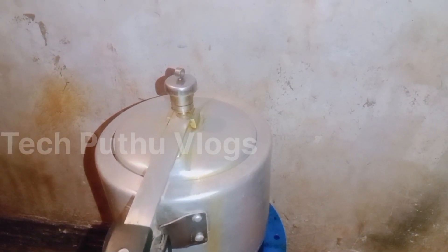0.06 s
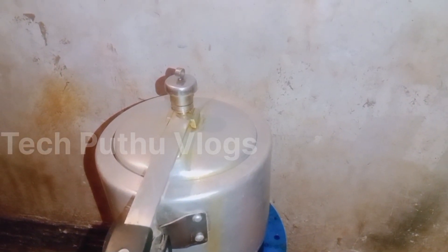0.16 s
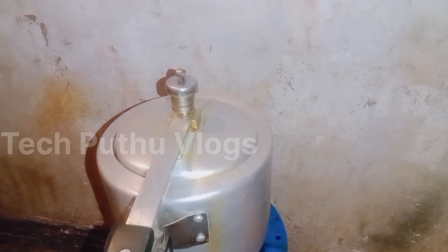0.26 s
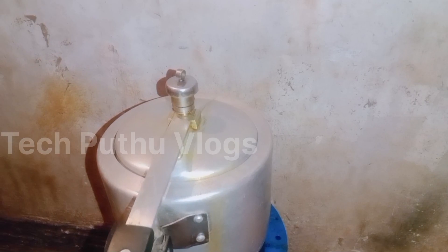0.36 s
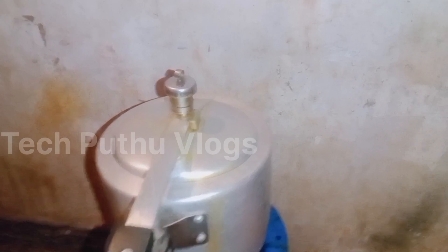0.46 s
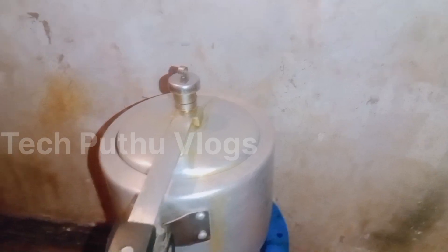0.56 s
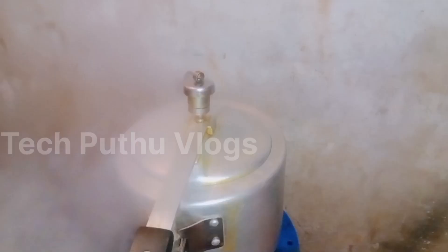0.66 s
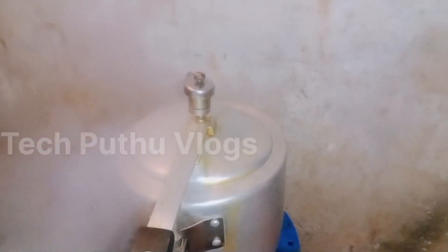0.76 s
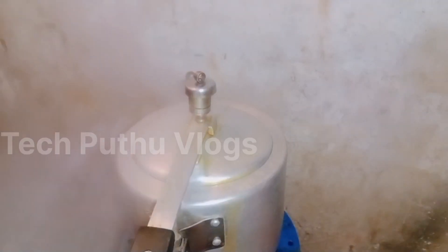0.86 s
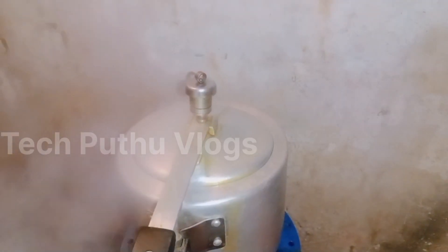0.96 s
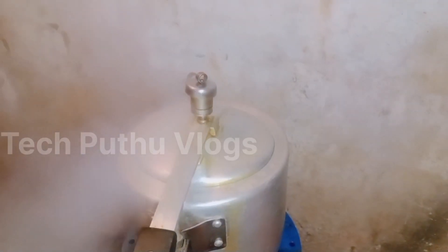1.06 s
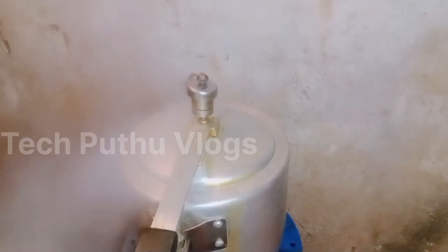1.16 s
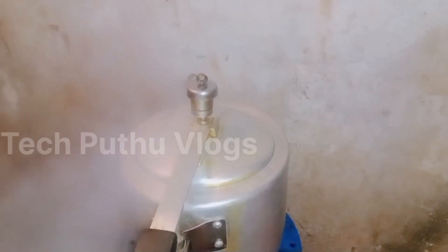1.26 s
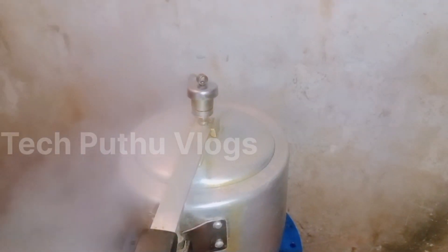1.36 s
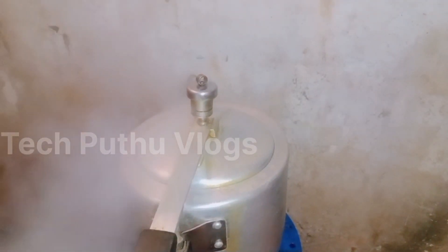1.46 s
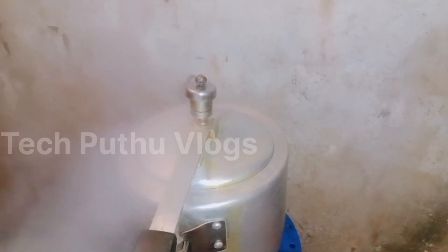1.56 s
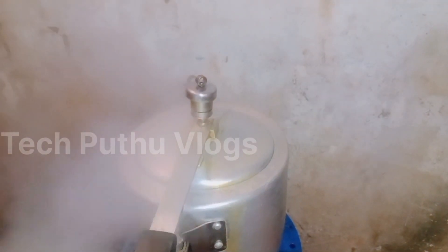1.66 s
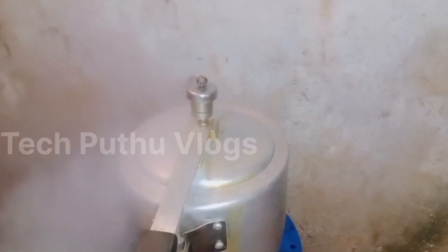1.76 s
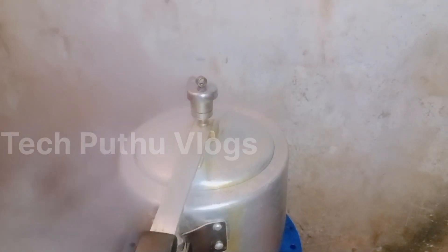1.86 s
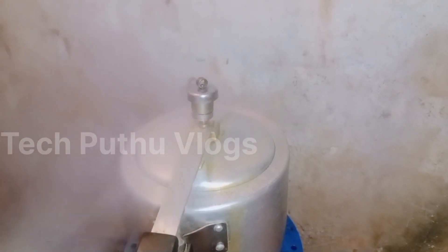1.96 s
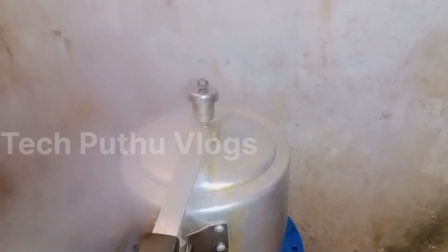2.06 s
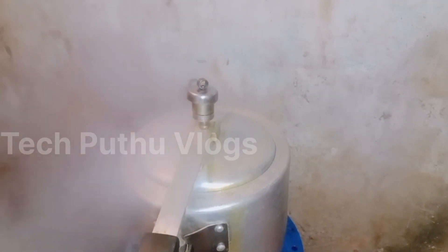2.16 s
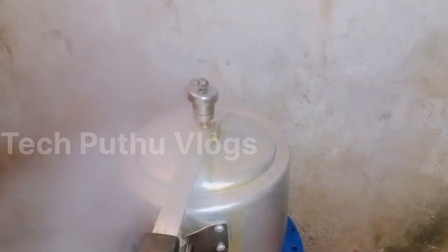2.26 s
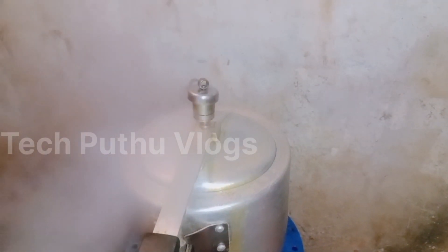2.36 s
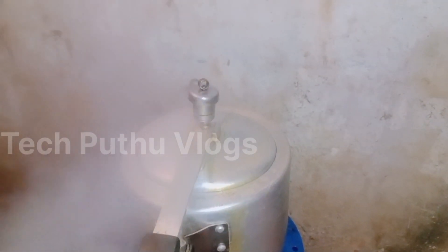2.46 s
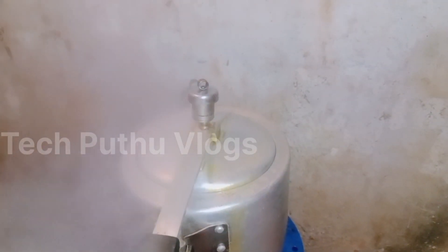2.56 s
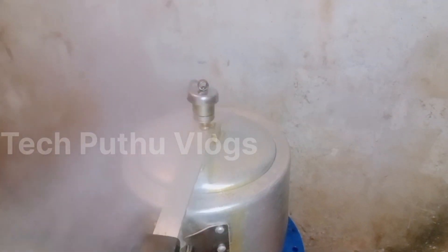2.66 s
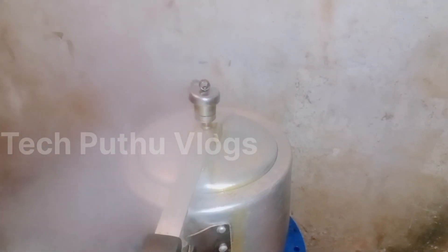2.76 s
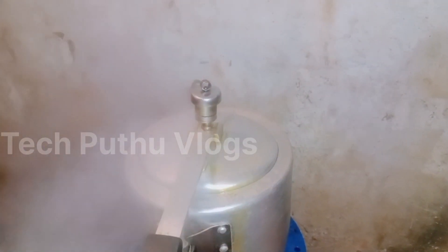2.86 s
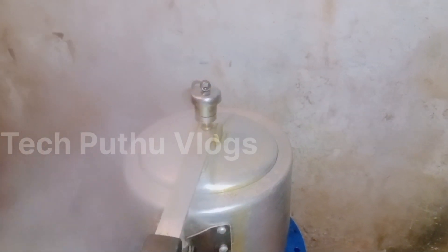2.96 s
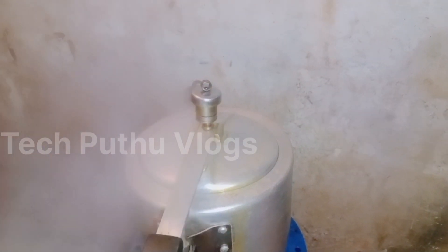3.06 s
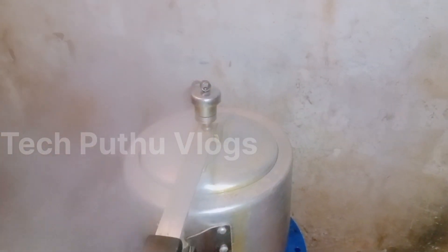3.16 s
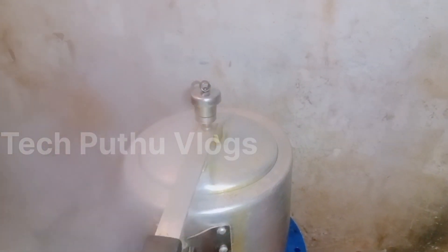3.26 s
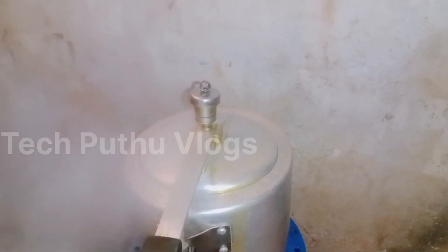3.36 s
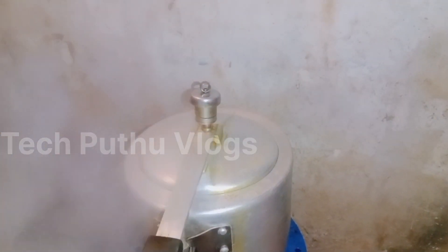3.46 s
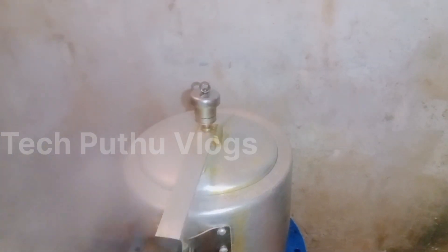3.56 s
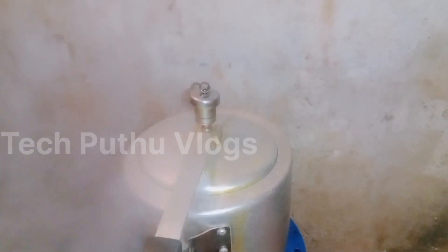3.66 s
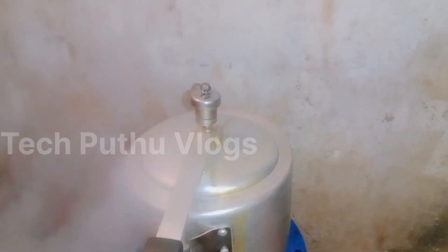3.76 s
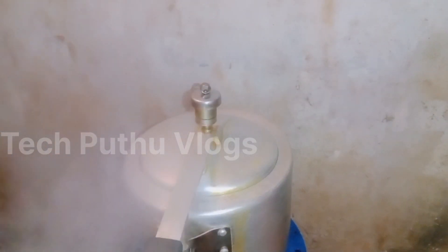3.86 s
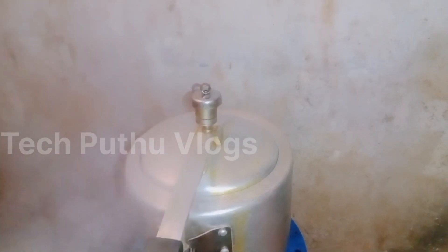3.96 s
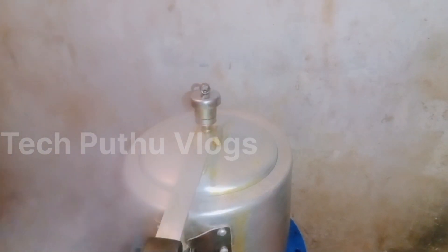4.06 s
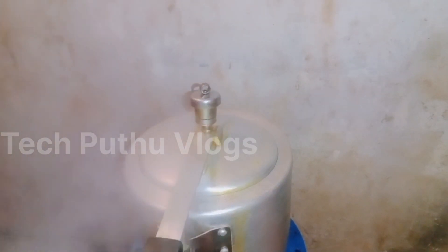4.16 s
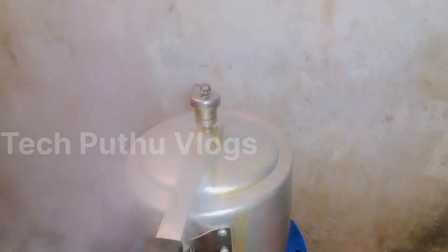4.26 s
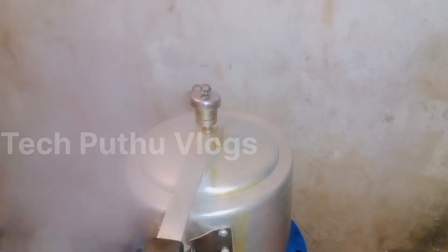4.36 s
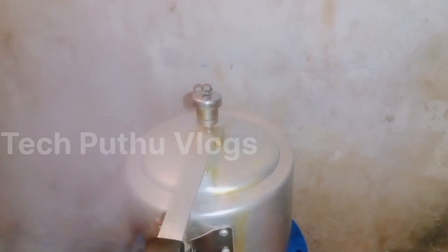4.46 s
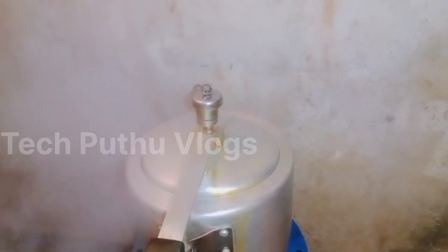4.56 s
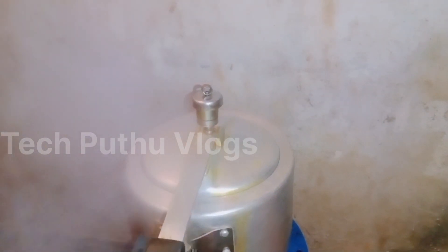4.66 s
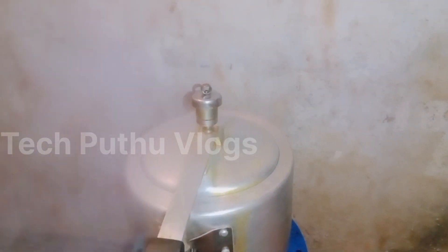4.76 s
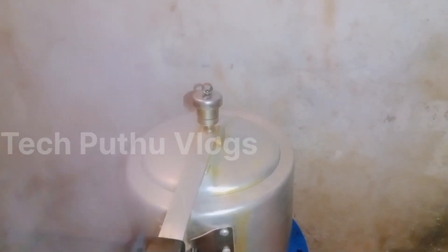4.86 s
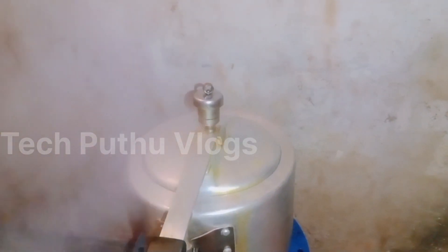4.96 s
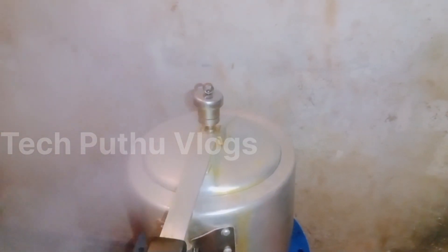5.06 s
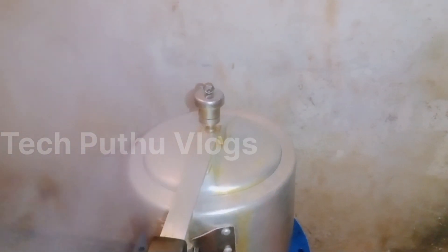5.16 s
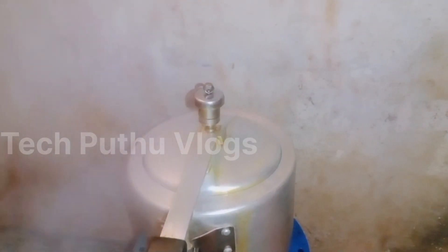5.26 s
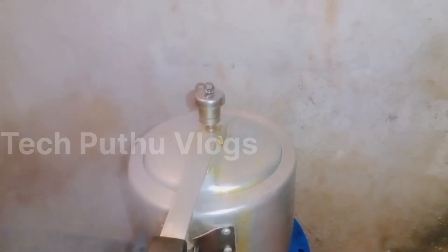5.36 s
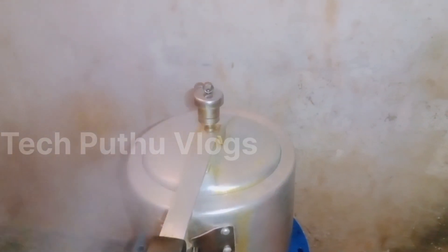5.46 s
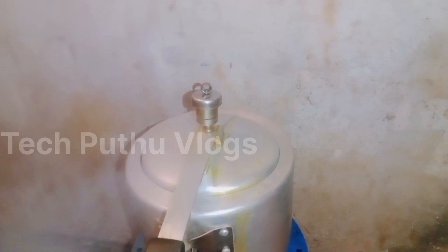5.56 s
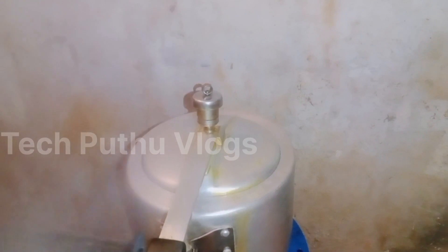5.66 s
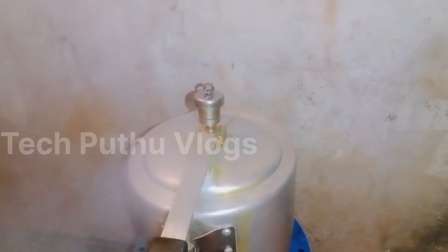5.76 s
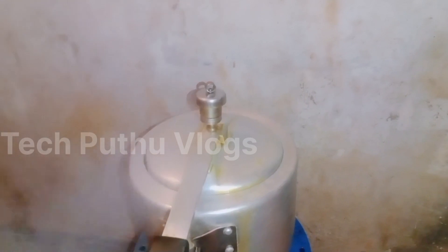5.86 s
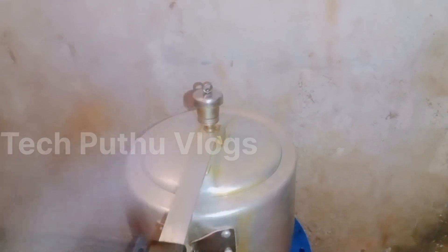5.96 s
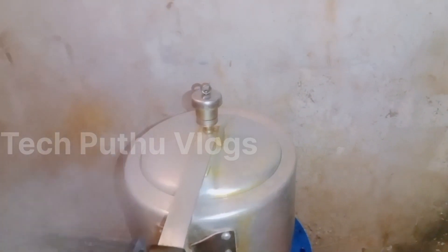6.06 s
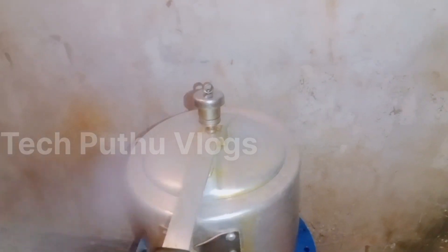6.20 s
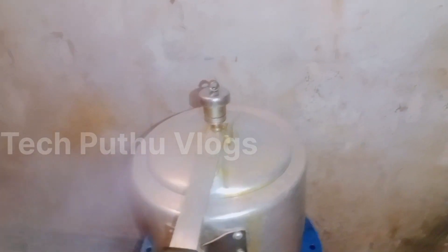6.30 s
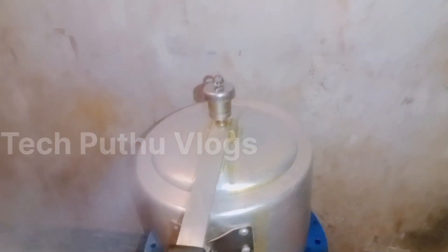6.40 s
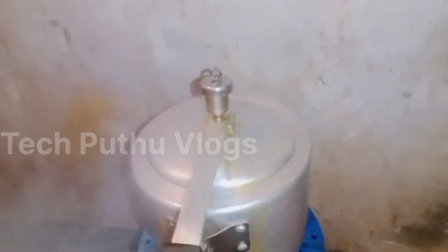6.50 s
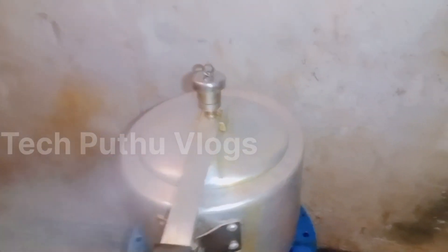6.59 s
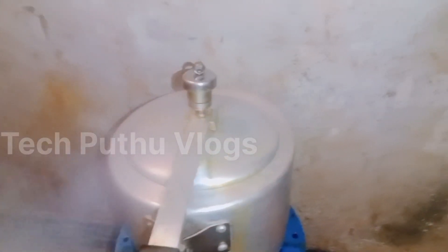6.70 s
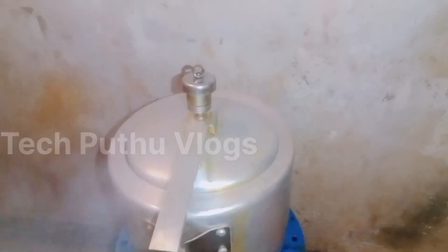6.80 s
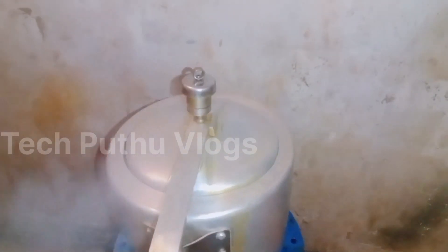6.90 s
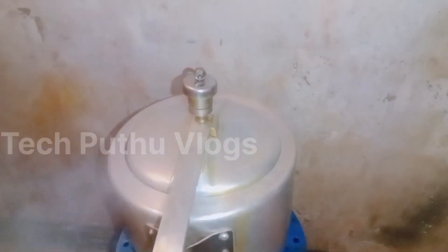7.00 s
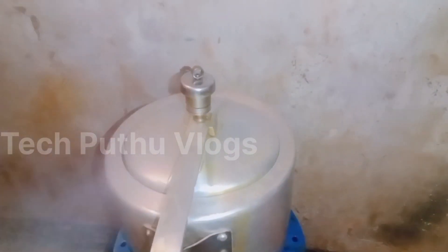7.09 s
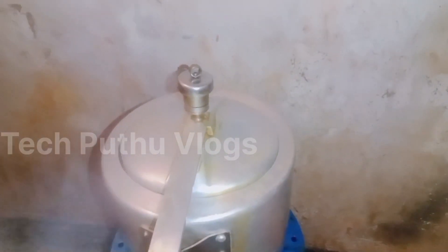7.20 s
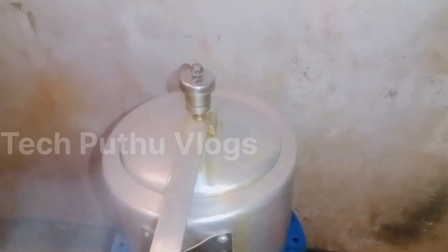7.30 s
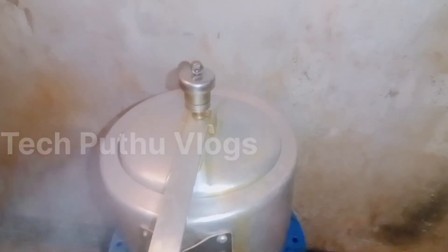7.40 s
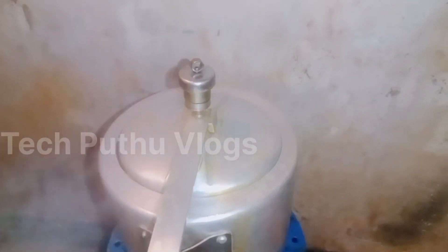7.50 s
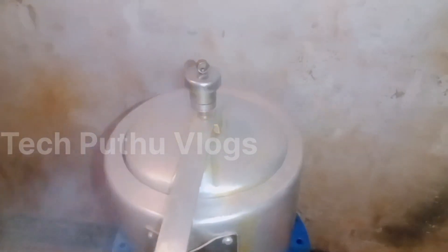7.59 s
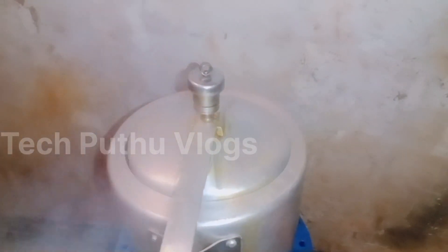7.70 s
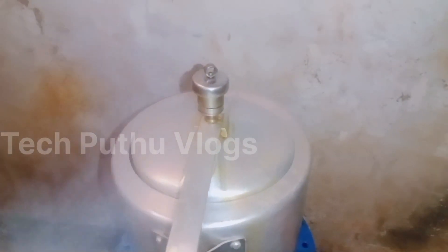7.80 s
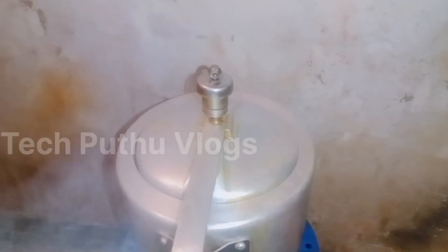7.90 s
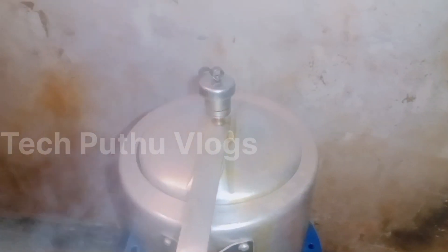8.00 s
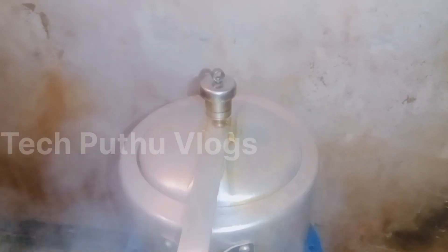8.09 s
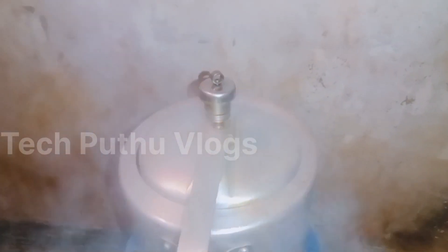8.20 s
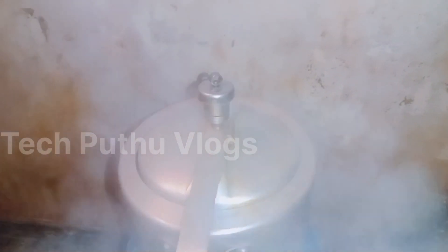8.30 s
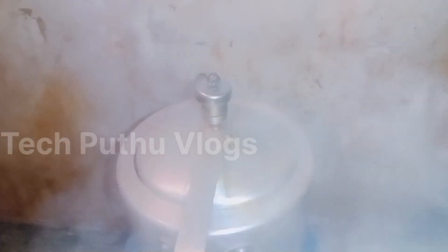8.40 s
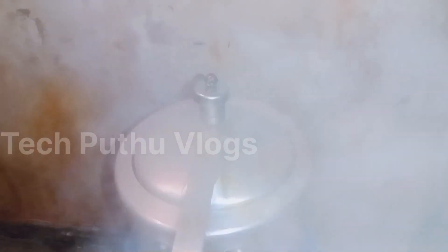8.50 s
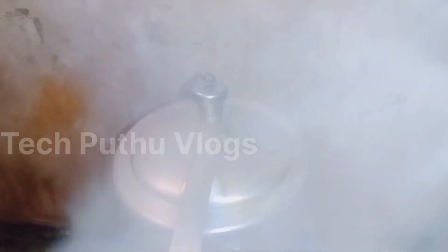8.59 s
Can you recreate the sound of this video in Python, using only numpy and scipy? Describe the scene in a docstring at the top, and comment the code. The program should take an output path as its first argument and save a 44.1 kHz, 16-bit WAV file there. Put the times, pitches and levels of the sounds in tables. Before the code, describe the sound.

Faint steam puffs and a brief silence give way to a pressure cooker's sustained roaring, whistling hiss, with gusts buffeting the close microphone.

```python
"""A kitchen, with a mono microphone close to a pressure cooker venting on the stove. Steam first leaks in soft
puffs under the weight valve, half burying two faint squeaks. The sound then drops out for a moment, and when it
returns the full jet blows: a roar and a shrill hiss with narrow whistling resonances, easing as the pressure
falls. Gusts of steam rumble and thump on the microphone; near the end it moves in closer and the resonances
shift."""
import sys
import numpy as np
from scipy import signal
from scipy.fft import rfft, irfft
from scipy.io import wavfile
from scipy.ndimage import uniform_filter1d

SR = 44100
rng = np.random.default_rng(int(sys.argv[2]) if len(sys.argv) > 2 else 0)


def unload_wav(signal):
    """Save mono or channel-first audio to the path in sys.argv[1] as 16-bit WAV at rate SR, clipped to [-1, 1]."""
    wavfile.write(
        sys.argv[1],
        SR,
        np.round(np.clip(np.atleast_2d(signal).T, -1, 1) * 32767).astype(np.int16),
    )


N = 381024
TIME = np.arange(N) / SR
FRAME, HOP = 8192, 2048
HZ = np.fft.rfftfreq(FRAME, 1 / SR)
FRAME_S = np.arange(N // HOP + 3) * HOP / SR
SILENCE_FROM_S, SILENCE_TO_S = 0.731, 0.962


def gain_of(db):
    """Decibels as an amplitude factor."""
    return 10 ** (np.asarray(db) / 20)


def unit_rms(x):
    """Scales to an rms of one."""
    return x / np.sqrt(np.mean(x ** 2) + 1e-20)


def hump(at_s, half_s):
    """A smooth swell in time, height one."""
    return np.exp(-((TIME - at_s) / half_s) ** 2)


def bell(hz, width_hz):
    """The shape of one resonance, height one."""
    return 1 / (1 + (2 * (HZ - hz) / width_hz) ** 2)


def resonances(modes):
    """The colour in dB of a set of peaks and nulls."""
    return sum(db * bell(hz, width_hz) for hz, width_hz, db in modes)


def per_frame(curve):
    """A curve in time as a column, one value for each frame."""
    return np.interp(FRAME_S, *np.transpose(curve))[:, None]


def wander(top_hz):
    """Smooth random motion of rms one, rolling off above top_hz."""
    hz = np.fft.rfftfreq(N, 1 / SR)
    return unit_rms(irfft(rfft(rng.standard_normal(N)) / (1 + (hz / top_hz) ** 4), N))


def turbulence(spectrum, colour_db=0):
    """Flow noise of rms one with a given spectral shape and a changing colour on top."""
    hz, db = np.transpose(spectrum)
    shape_db = np.interp(np.log(HZ + 1), np.log(hz + 1), db)
    real, imaginary = rng.standard_normal((2, len(FRAME_S), len(HZ)))
    frames = (real + 1j * imaginary) * gain_of(shape_db + colour_db)
    _, noise = signal.istft(frames.T, nperseg=FRAME, noverlap=FRAME - HOP)
    return unit_rms(noise[:N])


def wall_ripple(depth_db, count=5):
    """Reflections from wall and lid colour the steam with a fine ripple that drifts slowly all the time."""
    combs = unit_rms(uniform_filter1d(rng.standard_normal((count, len(HZ))), size=3, axis=1))
    place = np.linspace(0, count - 1, len(FRAME_S))[:, None]
    blend = np.sqrt(np.maximum(1 - abs(place - np.arange(count)), 0))
    return depth_db * blend @ combs


def eddies(depth_db):
    """Short-lived patches of colour, about 200 Hz wide, as eddies pass through the steam."""
    patches = uniform_filter1d(rng.standard_normal((len(FRAME_S), len(HZ))), size=40, axis=1)
    return depth_db * unit_rms(patches)


# Moving air right at the microphone: frequency_hz, relative_db
RUMBLE_SPECTRUM = [(20, -26), (60, -10), (110, -2.5), (220, 0), (400, -11), (1000, -8), (2500, -48)]
# Gusts of steam that hit the microphone: start_s, push_peak_db, wake_db, wake_decay_s
STEAM_GUSTS = [(1.085, -13, -29.5, .025), (1.167, -18, -35, .03), (1.231, -16, -40, .02),
               (1.273, -12, -27, 0.012), (1.307, -19, -41, .015), (1.361, -4.5, -33, .012),
               (1.479, -11, -33, .015), (1.52, 1, -26, .012), (1.532, -13, -37, .06), (1.707, -9, -27, .02),
               (1.718, -4.5, -27.5, .02), (1.732, -10, -40, .03), (1.788, -9, -34, .015),
               (2.037, -8.5, -37, .03), (2.085, -24, -36, .04), (2.15, -21, -41, .02),
               (2.306, -18.5, -34, .03), (3.415, -10.5, -27, 0.015), (3.474, -11, -36, .015),
               (4.709, -13.5, -42, .05), (5.413, -21, -38, .09), (6.304, -24, -37, .04),
               (6.438, -23, -36.5, .035)]


def air_rumble(wake_rise_s=0.0053):
    """Air rumbles on the microphone: the first cloud of steam, a light draught and each gust's wake."""
    cloud = gain_of(-39) * hump(at_s=1.5, half_s=0.32)
    draught = gain_of(-64) + gain_of(-54.5) * hump(at_s=4.34, half_s=0.75)
    lumps_db = 7 * np.tanh(wander(top_hz=8))
    strength = cloud * gain_of(lumps_db / 2) + draught * gain_of(lumps_db)
    strength *= TIME > STEAM_GUSTS[0][0]  # still air until the first gust
    for start_s, _, wake_db, decay_s in STEAM_GUSTS:
        # the wake builds just ahead of the push and dies away behind it
        fade = np.maximum((start_s - TIME) / wake_rise_s, (TIME - start_s) / decay_s)
        strength += gain_of(wake_db) * np.exp(-np.minimum(fade, 20))
    ragged_db = 2.5 * wander(top_hz=80)
    return turbulence(RUMBLE_SPECTRUM) * strength * gain_of(ragged_db)


def gust_thumps(bass_cut_hz=90, bass_cut_q=1.27, decay_s=0.00047, edge_hz=650):
    """Each gust is one short push of pressure; the microphone's bass cut makes it swing back."""
    t = np.arange(4096) / SR
    push = (1 - np.exp(-2 * np.pi * edge_hz * t)) ** 3 * np.exp(-t / decay_s)
    omega = 2 * np.pi * bass_cut_hz
    bass_cut = signal.bilinear([1, 0, 0], [1, omega / bass_cut_q, omega ** 2], SR)
    thump = signal.lfilter(*bass_cut, push)
    thump /= abs(thump).max()
    thumps = np.zeros(N)
    for start_s, peak_db, *_ in STEAM_GUSTS:
        start = round(start_s * SR)
        thumps[start:start + len(thump)] += gain_of(peak_db) * thump
    return thumps


# Two faint tones near 1 kHz: middle_s, half_length_s, pitch_hz, level_db
FAINT_SQUEAKS = [(.33, .02, 885, -68), (.64, .04, 1000, -65)]


def squeaks(waver=0.025):
    """Short wavering tones, half buried in the leak."""
    wavering_s = np.cumsum(1 + waver * wander(top_hz=90)) / SR
    return sum(gain_of(db) * hump(at_s, half_s) * np.sin(2 * np.pi * hz * wavering_s)
               for at_s, half_s, hz, db in FAINT_SQUEAKS)


# The leak from close by, its hiss and its lower body: frequency_hz, relative_db
LEAK_HISS_SPECTRUM = [(2820, -71), (4800, -44), (5040, -32), (5560, -17), (6040, -19), (6660, -5.5),
                      (7740, -1), (8580, -3.5), (9460, -14), (10200, -13), (11400, -21), (13000, -16),
                      (15400, -23)]
LEAK_BODY_SPECTRUM = [(30, -16), (90, -11), (170, -18.5), (400, -24), (620, -27), (980, -19), (1200, -21),
                      (1380, -8.5), (2300, -11), (3000, -13.5), (3850, -16.5), (4700, -33), (6100, -64)]
# Puffs that escape as the weight rocks: middle_s, half_length_s, hiss_db, body_db
LEAK_PUFFS = [(.092, .022, -46, -65), (.19, 0.051, -50, -65), (0.322, 0.038, -49, -67),
              (.445, .026, -48, -66), (.6, 0.041, -43.5, -56), (.722, 0.029, -40, -56)]


def leak(seep_hiss_db=-47.5, seep_body_db=-61.5):
    """Steam seeps and sputters through the narrow gap under the seated weight."""
    hiss_gain, body_gain = gain_of(seep_hiss_db), gain_of(seep_body_db)
    for at_s, half_s, hiss_db, body_db in LEAK_PUFFS:
        puff = hump(at_s, half_s)
        hiss_gain += gain_of(hiss_db) * puff
        body_gain += gain_of(body_db) * puff
    colour_db = wall_ripple(depth_db=3.5) + eddies(depth_db=2.0)
    hiss = hiss_gain * turbulence(LEAK_HISS_SPECTRUM, colour_db)
    body = body_gain * turbulence(LEAK_BODY_SPECTRUM, colour_db)
    sputter_db = 0.6 * wander(top_hz=70)
    return (hiss + body) * gain_of(sputter_db) * (TIME < SILENCE_TO_S)


# Peaks and nulls at the microphone's first position, then closer in: pitch_hz, width_hz, lift_db
FIRST_RESONANCES = [(2040, 40, 3.5), (2320, 24, 4), (2885, 34, 5), (3181, 24, 4), (3741, 20, 4.5),
                    (4247, 20, 4), (5109, 18, 4.5), (5432, 14, 5), (5625, 16, 6.5), (5905, 20, 9.5),
                    (6401, 16, 4), (6508, 22, 4), (6660, 70, -3), (6745, 18, 8.5), (6835, 30, -4),
                    (6997, 20, 6.5), (7080, 40, -5.5), (7394, 22, 6.5), (7600, 34, -5), (7667, 32, 5.5),
                    (7722, 24, -4.5), (7811, 28, 3), (7922, 22, 4), (8059, 24, 3), (8475, 40, -4),
                    (8540, 18, 5), (8779, 20, 4), (9695, 18, 4.5), (10902, 20, 6)]
CLOSER_RESONANCES = [(1798, 63, 4), (1870, 82, -2), (2130, 53, 2), (2300, 140, 5), (2705, 40, 3),
                     (3240, 28, 1), (7250, 23, -3), (8180, 37, 7)]
# The microphone moves in, then a little back: time_s, closeness_fraction
MICROPHONE_MOVE = [(6.0, 0), (6.7, .5), (7.3, 1), (7.9, 1), (8.6, .65)]
# Broad bands in which the first, wet steam sizzles: centre_hz, width_hz, lift_db
SPRAY_BANDS = [(1120, 680, 2), (5940, 1500, 3.5), (14700, 2000, 3)]
# The steam dries as the blast goes on: time_s, wetness_fraction
STEAM_WETNESS = [(1, 1), (2, 0.7), (2.7, 0.23), (6, 0)]


def jet_colour():
    """Resonances between valve, lid and wall, wet spray and eddies colour the jet, in dB per frame."""
    closeness = per_frame(MICROPHONE_MOVE)
    colour_db = (1 - closeness) * resonances(FIRST_RESONANCES)
    colour_db += closeness * resonances(CLOSER_RESONANCES)
    colour_db += per_frame(STEAM_WETNESS) * resonances(SPRAY_BANDS)
    colour_db += wall_ripple(depth_db=1.7 * (1 + closeness / 4)) + eddies(depth_db=1.2)
    # the plume sways, and its low rush ebbs and swells
    sway_db = np.interp(FRAME_S, TIME, 3.5 * wander(top_hz=4)) - 0.5
    return colour_db + np.outer(sway_db, bell(hz=250, width_hz=320))


# The open jet at close range, its roar, shrill hiss and top fizz: frequency_hz, relative_db
ROAR_SPECTRUM = [(60, -39), (160, -19.5), (230, -12), (310, -5), (450, -4.5), (800, -3.5), (1200, -3),
                 (2200, 1.5), (2600, 0), (3600, 0), (4300, -7.5), (4750, -18), (6200, -48)]
HISS_SPECTRUM = [(4000, -43), (4800, -38.5), (5150, -20.5), (5750, -15.5), (6080, -15), (6400, -10),
                 (7100, -1), (7900, 0), (8450, -2.5), (8950, -4), (9300, -15.5), (10000, -35), (12000, -68)]
FIZZ_SPECTRUM = [(8000, -22), (9400, -1), (10000, 4.5), (11000, 1.5), (11400, -1.5), (12200, 0), (12900, 0),
                 (13300, -2), (13850, -11), (14200, -10), (14700, 1), (15400, -4)]


def jet(lift_at_s=0.95, lift_s=0.28):
    """The weight lifts and the jet opens evenly; roar, hiss and fizz ease as the pressure falls."""
    age_s = np.maximum(TIME - lift_at_s, 0)
    opening = np.minimum(age_s / lift_s, 1)
    colour_db = jet_colour()
    sputter_db = 0.36 * wander(top_hz=35)
    # the hiss dips and swells as the plume swings
    swing_db = 1.1 * (hump(at_s=6.38, half_s=0.17) - hump(at_s=6.043, half_s=0.082))
    swing_db += 0.16 * wander(top_hz=6)
    # each band sags from its own level at its own rate in dB per second
    roar = gain_of(-24 - 0.2635 * age_s + sputter_db) * turbulence(ROAR_SPECTRUM, colour_db)
    hiss = gain_of(-14.5 - 0.2666 * age_s + swing_db) * turbulence(HISS_SPECTRUM, colour_db)
    fizz = gain_of(-22 - 0.43 * age_s) * turbulence(FIZZ_SPECTRUM, colour_db)
    flutter_db = 0.22 * wander(top_hz=150)  # the weight trembles on the jet
    return (roar + hiss + fizz) * opening * gain_of(flutter_db)


def scene():
    """All sources meet at one microphone beside the stove, the same on both channels."""
    mono = leak() + squeaks() + jet() + air_rumble() + gust_thumps()
    return np.array([mono, mono])


def record(dry, fade_s=0.0038, ceiling=0.97, top_hz=15520):
    """The sound drops out just before the jet, the hardest gust overloads, and the top treble is cut."""
    outside_silence_s = np.maximum(SILENCE_FROM_S - TIME, TIME - SILENCE_TO_S)
    gate = np.clip(outside_silence_s / fade_s, 0, 1)
    clipped = np.clip(dry * gate, -ceiling, ceiling)
    low_pass = signal.firwin(1023, top_hz, window=("kaiser", 9), fs=SR)
    return signal.oaconvolve(clipped, low_pass[None], "same")


dry = scene()
out = record(dry)
unload_wav(out)
```